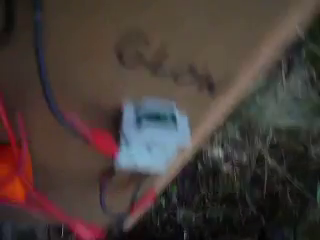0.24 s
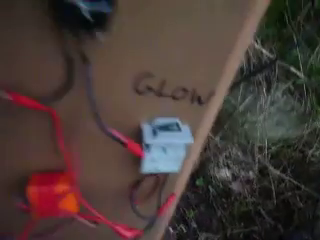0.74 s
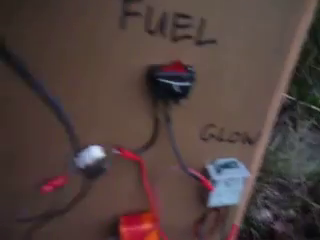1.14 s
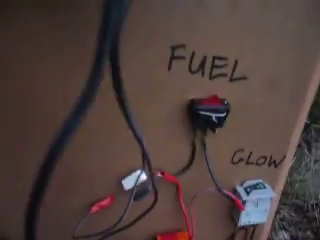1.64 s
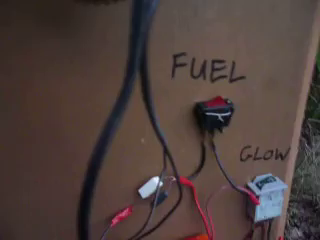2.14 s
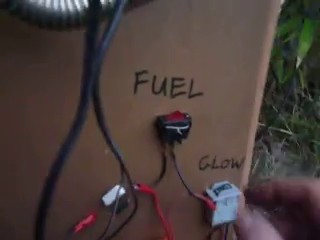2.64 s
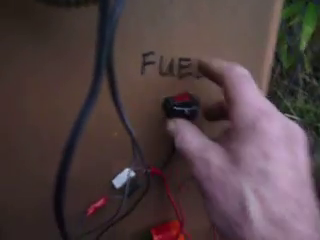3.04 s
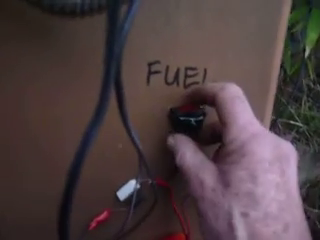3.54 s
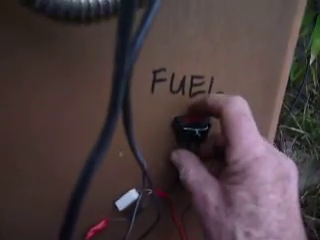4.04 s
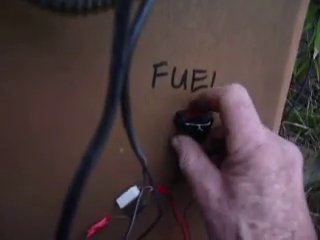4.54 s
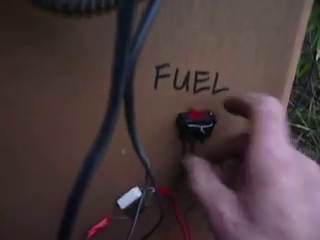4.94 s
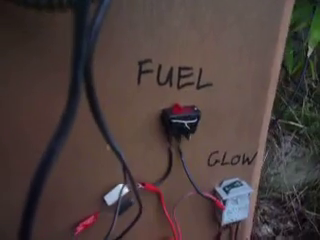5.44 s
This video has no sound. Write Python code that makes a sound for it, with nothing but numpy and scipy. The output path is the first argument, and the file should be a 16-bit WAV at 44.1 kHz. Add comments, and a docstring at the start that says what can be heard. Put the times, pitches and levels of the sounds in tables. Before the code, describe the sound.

Steady buzzy whirr of a little fan motor with rushing air; late on, a loud plastic click on a board, then two fainter thumps.

```python
"""A small blower motor hums and whines outdoors; a sharp snap comes late, then two softer knocks.
The motor is a bank of sines on multiples of a sagging shaft speed, set in shaped air noise.
Path gains follow a hand-held camera that swings round and then settles.
Dying modes make a rocker switch snap on a board and the knocks; gain control ducks the hum after the snap.
"""
import sys
import numpy as np
from scipy import signal
from scipy.io import wavfile
from scipy.ndimage import uniform_filter1d

SR = 44100
rng = np.random.default_rng(int(sys.argv[2]) if len(sys.argv) > 2 else 0)


def volts_from_decibels(level):
    """Turn decibel levels (scalar or array-like) into linear amplitude factors."""
    exponent = np.asarray(level, float) / 20
    return 10 ** exponent


def generate_wav(signal):
    """Clip the signal to [-1, 1] and save it as 16-bit WAV at the path in sys.argv[1]."""
    frames = np.transpose(np.atleast_2d(signal))
    scaled = np.clip(frames, -1, 1) * 32767
    pcm = np.round(scaled).astype(np.int16)
    wavfile.write(sys.argv[1], SR, pcm)


N = 250488

# shaft speed, sagging slowly: (time [s], speed [turns/s])
SHAFT_SPEED = [(0, 43.11), (0.3, 43.085), (1.0, 43.072), (2.1, 42.973), (2.8, 42.943), (3.5, 42.966),
               (4.2, 42.897), (5.1, 42.815), (5.4, 42.745), (5.68, 42.73)]
SPEED_START_HZ = SHAFT_SPEED[0][1]
# air rush and brushes, dulled above 3.5 kHz by the microphone, before path gain:
# (frequency [Hz], level [dB in 7 Hz])
AIR_LEVEL = [(60.0, -74), (150.0, -54), (280.0, -55), (540.0, -51.5), (750.0, -54), (920.0, -58),
             (1230.0, -60.5), (1610.0, -56), (2040.0, -58.5), (2300.0, -55.5), (2950.0, -55),
             (3330.0, -57.5), (3590.0, -67), (3890.0, -73.5), (4360.0, -86.5), (4920.0, -87),
             (5220.0, -105)]


def read(points, hz):
    """Interpolates (Hz, value) points by straight lines on a log-frequency axis."""
    f, value = np.transpose(points)
    return np.interp(np.log(hz + 1), np.log(f + 1), value)


def tones(turns, faint_db=-5, waver_db=1., scatter_rad=.45):
    """Shaft orders: one sine a multiple; whine groups loosely in step swell once a turn."""
    # clear motor tones, the seventh from the commutator, before path gain:
    # (multiple of shaft speed [-], level [dB rms])
    orders = [(1, -72.0), (3, -55.0), (4, -58.0), (5, -58.0), (7, -38.0), (10, -47.0), (12, -51.0),
              (13, -53.0), (14, -41.0), (16, -52.0), (17, -46.0), (18, -50.0), (19, -60.0), (20, -55.0),
              (21, -48.0), (24, -55.0), (25, -63.0), (26, -63.0), (28, -58.0), (39, -52.0), (40, -51.0),
              (41, -56.0), (49, -61.0), (50, -59.0), (51, -53.0), (52, -54.0), (54, -56.0), (55, -44.0),
              (56, -43.0), (57, -47.0), (58, -58.0), (59, -59.0), (60, -50.0), (61, -58.0), (62, -48.0),
              (63, -54.0), (65, -61.0), (66, -58.0), (67, -58.0), (70, -55.0), (71, -46.0), (72, -44.0),
              (73, -53.0), (74, -60.0), (75, -59.0), (77, -48.0), (78, -51.0), (79, -53.0), (80, -63.0),
              (81, -67.0), (86, -65.0), (88, -70.0), (89, -72.0), (90, -74.0), (93, -74.0), (96, -80.0),
              (97, -83.0), (98, -85.0), (99, -80.0), (100, -82.0), (101, -89.0), (104, -87.0), (105, -86.0),
              (106, -79.0), (107, -82.0), (108, -89.0), (111, -85.0), (112, -83.0), (114, -82.0),
              (116, -86.0), (118, -86.0)]
    # whine multiples that start every turn together: multiple of shaft speed [-]
    in_step = [51, 52, 54, 55, 56, 57, 71, 72, 77, 78, 79]
    multiples = np.arange(1, 122)
    grid_s = np.arange(0, N / SR + .02, .01)

    # multiples not listed lie faint_db from the air level
    level_db = read(AIR_LEVEL, multiples * SPEED_START_HZ) + faint_db
    for order, db in orders:
        level_db[int(order) - 1] = db

    drift = rng.standard_normal((len(grid_s), len(multiples)))
    drift = uniform_filter1d(drift, size=25, axis=0).T
    waver = waver_db * drift / drift.std()
    gain_db = level_db[:, None] + swing_db(multiples, grid_s) + waver
    peaks = np.sqrt(2) * volts_from_decibels(gain_db)

    free_rad = rng.random(len(multiples)) * 2 * np.pi
    loose_rad = scatter_rad * rng.standard_normal(len(multiples))
    phases_rad = np.where(np.isin(multiples, in_step), loose_rad, free_rad)

    now_s = np.arange(N) / SR
    out = np.zeros(N)
    for multiple, peak, phase_rad in zip(multiples, peaks, phases_rad):
        out += np.interp(now_s, grid_s, peak) * np.cos(2 * np.pi * multiple * turns + phase_rad)
    return out


def swing_db(multiples, t_s):
    """Path gain of each shaft-speed multiple over time, set by how the camera is held."""
    # camera hold: (time [s], turned away from the motor [0-1 nominal], tilted up [0-1])
    hold = [(0, 1.01, 0.06), (.4, 0.9, 0.6), (.7, 0.42, .6), (1.0, 0.04, 0.8), (1.25, 0.07, 0.78),
            (1.5, .08, 0.49), (1.9, 0, 0.33), (2.501, .02, 0), (3.5, 0.03, 0.01), (4.5, 0, .02),
            (5.68, 0.15, 0.13)]
    # path colour: (frequency [Hz], gain turned away [dB], gain tilted up [dB])
    postures = [(125, -3.5, -1.1), (300, -0.5, -0.1), (615, -4.5, -0.5), (930, 2, 5.5), (1480, 9.5, -2),
                (1700, 5, 1), (2470, -2.5, -6.5), (2630, -11.5, -1.5), (2880, 1.7, -9.5), (3090, 0, -10),
                (3350, -10.5, -3.5), (3840, -5, 5.5), (4640, -3, 4.5)]
    # brief swell or fade of a tone group as the hand moves:
    # (time [s], 1/e half length [s], centre [Hz], gain [dB])
    fades = [(.05, .2, 2400, 3.5), (.08, .2, 3090, 2), (3.0, 0.95, 3400, 0.5), (3.7, .5, 950, -2.5),
             (4.6, .6, 740, 2.2), (0.43, .15, 2400, -7), (.42, .15, 600, -6.5), (1.1, .15, 3090, -5.5),
             (4, .6, 600, -2), (4.9, .3, 2400, -1.5)]
    fade_octaves = 0.1  # 1/e half width

    hz = np.maximum(multiples, 1) * SPEED_START_HZ
    hold_s, away, up = np.transpose(hold)
    away_db = read([(f, db) for f, db, _ in postures], hz)
    up_db = read([(f, db) for f, _, db in postures], hz)
    gain_db = np.outer(away_db, np.interp(t_s, hold_s, away))
    gain_db = gain_db + np.outer(up_db, np.interp(t_s, hold_s, up))
    for at_s, half_s, fade_hz, db in fades:
        in_band = np.exp(-(np.log2(hz / fade_hz) / fade_octaves) ** 2)
        in_time = np.exp(-((t_s - at_s) / half_s) ** 2)
        gain_db = gain_db + db * np.outer(in_band, in_time)
    return gain_db


def blows():
    """Each blow rings the board and the plastic switch body; the switch dominates only the snap."""
    # blows, before gain control: (time [s], knock peak [dB], plastic snap peak [dB])
    hits = [(4.6162, -19.5, -5), (5.168, -22.5, -52), (5.622, -36, -43)]
    # board modes, before peak scaling: (frequency [Hz], level [dB], t60 [s])
    board_modes = [(121, -6, 0.044), (176, 13, 0.036), (257, -2, 0.073)]
    # switch modes, before peak scaling: (frequency [Hz], level [dB], t60 [s])
    switch_modes = [(25, -27, 0.13), (83, -26, 0.13), (207.6, -27.5, 0.28), (373, -22, 0.095),
                    (500, -18, 0.059), (677, -17, 0.02), (1160, -6, 0.0097), (1810, -16.5, 0.014),
                    (2450, -11.5, 0.021), (3040, 2.5, 0.0057), (3750, -6, 0.0092), (5550, -28.5, 0.0068)]

    out = np.zeros(N + SR)
    knock = ring(board_modes, rise_s=0.0035)
    snap = ring(switch_modes, rise_s=0.0012)
    for at_s, knock_db, snap_db in hits:
        at = round(at_s * SR)
        out[at:at + len(knock)] += volts_from_decibels(knock_db) * knock + volts_from_decibels(snap_db) * snap
    return out[:N]


def ring(modes, rise_s):
    """Sum of exponentially dying sines after one blow, softened at the start, peak 1."""
    t = np.arange(SR // 5) / SR
    sound = sum(volts_from_decibels(db - 60 * t / t60_s) * np.sin(2 * np.pi * hz * t) for hz, db, t60_s in modes)
    sound = sound * (1 - np.exp(-(t / rise_s) ** 2))
    return sound / abs(sound).max()


def air():
    """Broadband air rush, less directional than the tones except in the treble."""
    # (frequency [Hz], share of path gain [-])
    follows = [(150, .7), (500, .2), (2000, .4), (2700, .6), (3300, .4), (3700, 1.2), (4500, 1.5)]

    def level_db(hz, t_s):
        source_db = read(AIR_LEVEL + [(9000, -140)], hz)[:, None]
        return source_db + read(follows, hz)[:, None] * swing_db(hz / SPEED_START_HZ, t_s)

    return noise(level_db, patchy_db=1.)


def hiss():
    """Steady self-noise of the recorder."""
    # (frequency [Hz], level [dB in 7 Hz])
    hiss_level = [(20, -72.5), (60, -81.5), (4000, -92), (5300, -89), (6200, -90), (7600, -91.5),
                  (8200, -99), (8800, -117), (9500, -150)]
    return noise(lambda hz, t_s: read(hiss_level, hz)[:, None] + 0 * t_s)


def noise(db, patchy_db=0.):
    """Gaussian short-time spectra of level db(Hz, s) [dB in 7 Hz], with drifting patches."""
    frames = N // 256 + 5
    hz = np.fft.rfftfreq(1024, 1 / SR)
    real, imag, patches = rng.standard_normal((frames, 513, 3)).T
    patches = uniform_filter1d(patches, size=8, axis=0)  # bins
    patches = uniform_filter1d(patches, size=12, axis=1)  # frames
    field_db = db(hz, np.arange(frames) * 256 / SR) + patchy_db * patches / patches.std()
    unit = np.sqrt(SR / 1024 / 7 / 4)  # 7 Hz level to bin amplitude
    spectra = unit * (real + 1j * imag) * volts_from_decibels(field_db)
    return signal.istft(spectra, nperseg=1024, noverlap=768)[1][:N]


def scene():
    """Sums motor tones, air and blows, one channel."""
    speed_hz = np.interp(np.arange(N) / SR, *np.transpose(SHAFT_SPEED))
    turns = np.cumsum(speed_hz) / SR
    return (tones(turns) + air() + blows())[None]


def roll_off(x):
    """The treble ends steeply here."""
    return signal.sosfilt(signal.butter(12, 8850, fs=SR, output="sos"), x)


def record(dry, knee_db=-24, squeeze_db_per_db=0.48, detector_fall_db_per_s=25):
    """Gain control ducks the hum after the snap; self-noise and a DC offset join after it."""
    power = uniform_filter1d(dry[0] ** 2, size=132, origin=65)  # past 3 ms
    power_db = 10 * np.log10(abs(power) + 1e-12)
    fall_db = np.arange(N) * detector_fall_db_per_s / SR
    held_db = np.maximum.accumulate(power_db + fall_db) - fall_db
    over_db = np.maximum(held_db - knee_db, 0)
    lagged_db = signal.lfilter([1 / 200], [1, 1 / 200 - 1], over_db)  # 200 samples
    ducked = dry / volts_from_decibels(squeeze_db_per_db * lagged_db)
    dc_offset = -.0015
    return roll_off(ducked + hiss() + dc_offset)


dry = scene()
out = record(dry)
generate_wav(out)
```